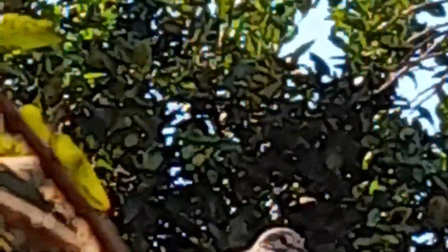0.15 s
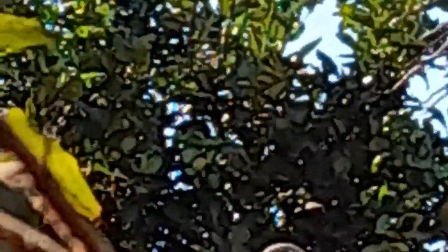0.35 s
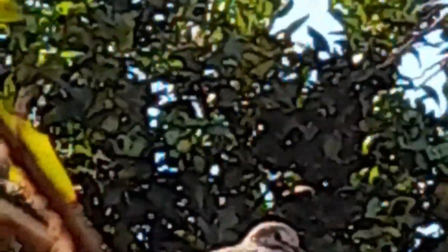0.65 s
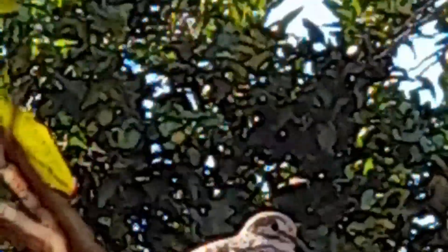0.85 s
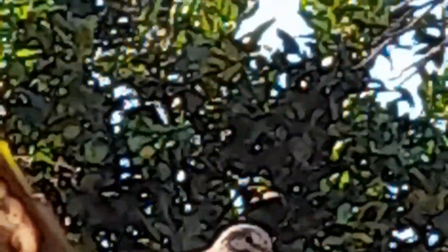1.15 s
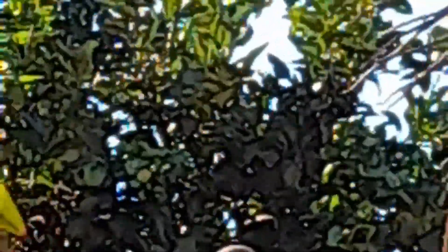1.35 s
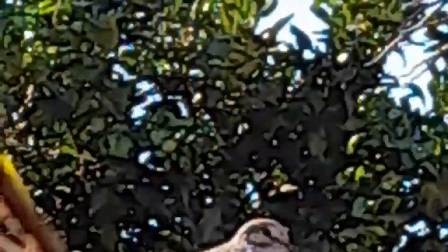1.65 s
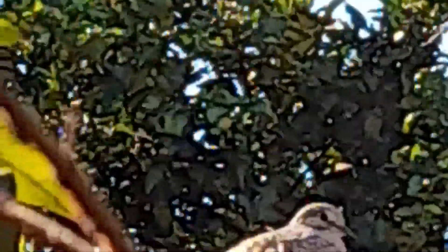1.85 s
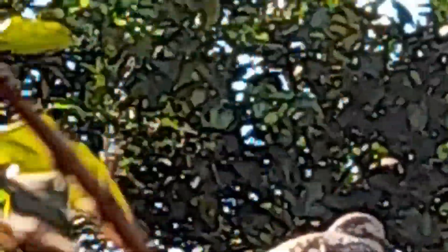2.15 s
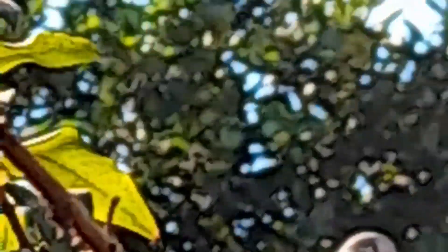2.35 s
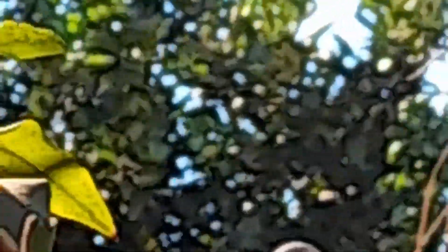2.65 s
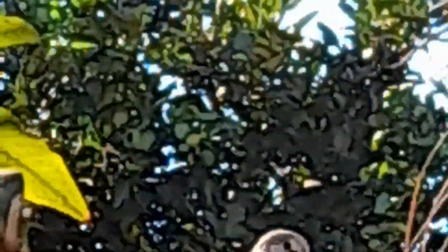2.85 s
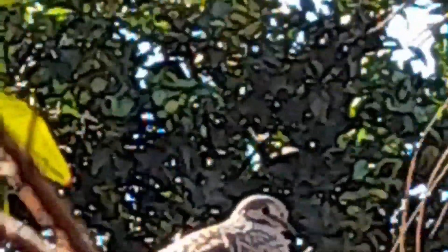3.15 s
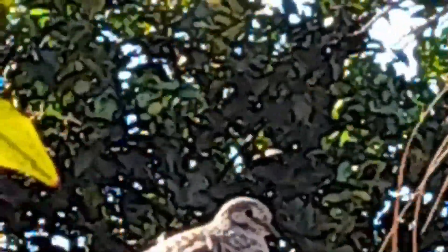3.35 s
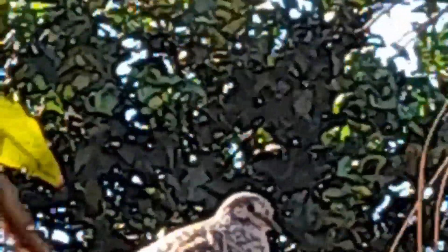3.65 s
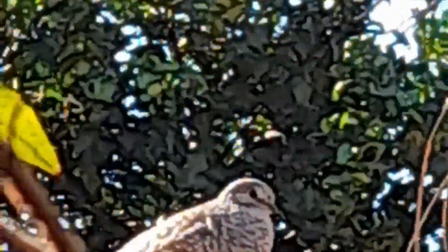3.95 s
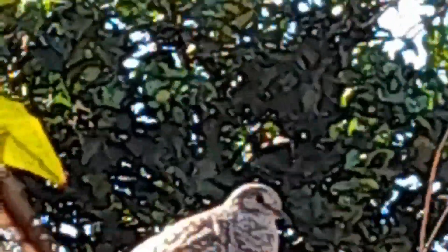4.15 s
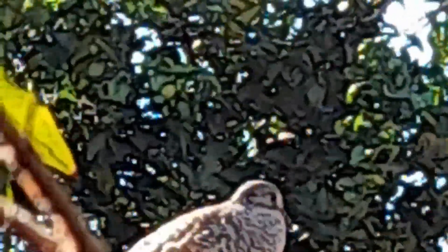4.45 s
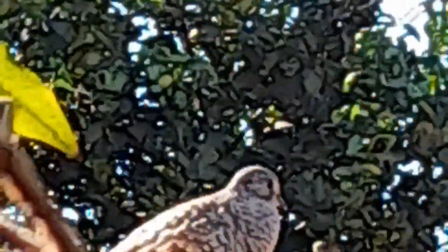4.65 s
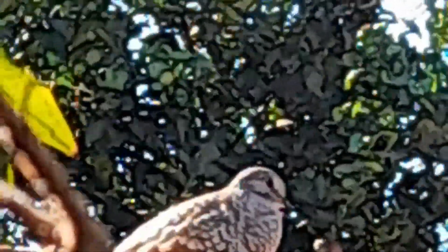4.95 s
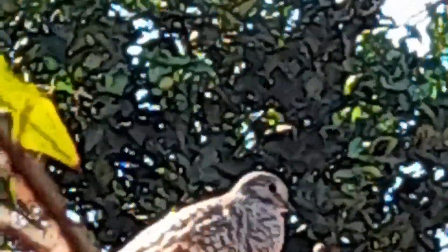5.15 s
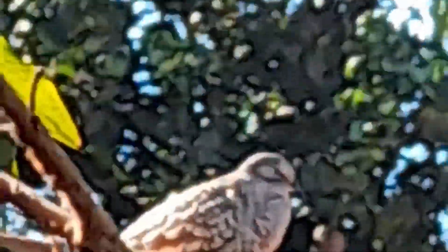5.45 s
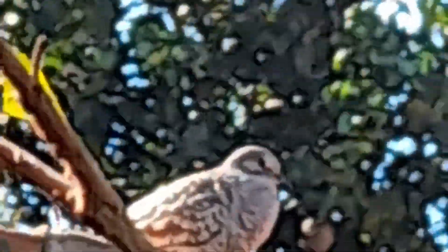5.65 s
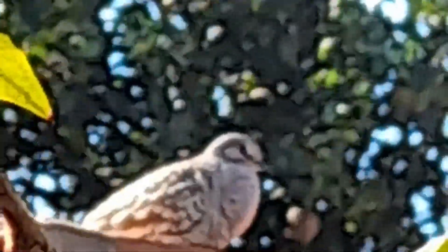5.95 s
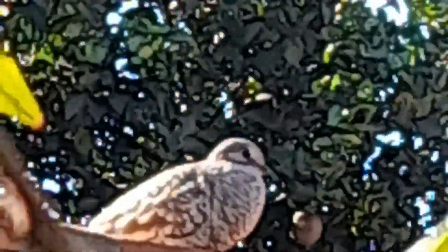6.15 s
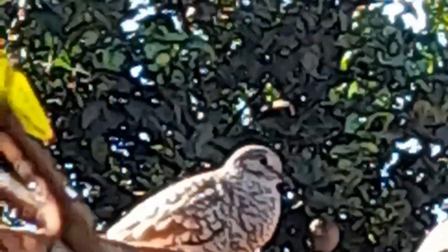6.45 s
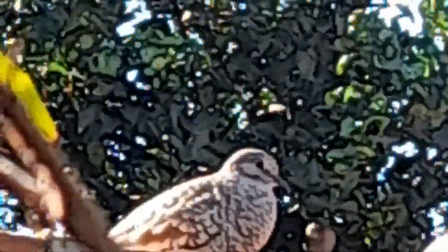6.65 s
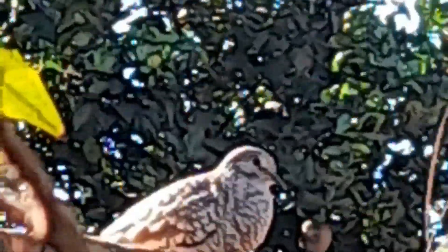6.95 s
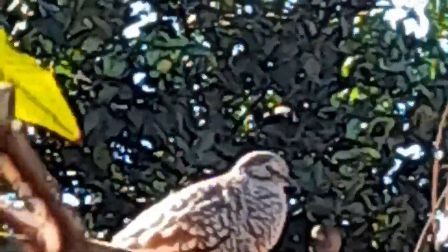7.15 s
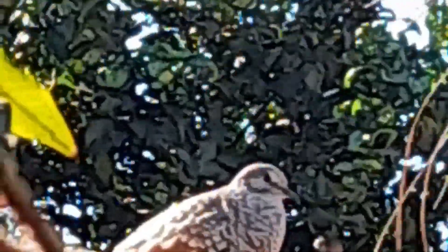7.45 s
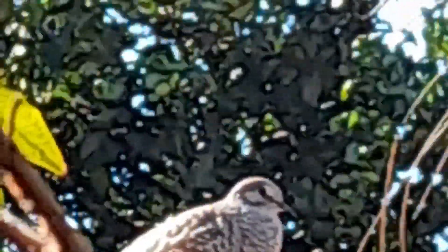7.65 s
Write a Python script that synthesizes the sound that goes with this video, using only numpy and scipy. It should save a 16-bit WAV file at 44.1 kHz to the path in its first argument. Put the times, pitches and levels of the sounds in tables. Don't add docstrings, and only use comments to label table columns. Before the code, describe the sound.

A small dove coos quick three-note phrases outdoors, over low fluttering wind rumble on the microphone, faint leaf hiss and tiny twig ticks.

```python
import sys
import numpy as np
from scipy import signal
from scipy.fft import rfft, irfft, next_fast_len
from scipy.io import wavfile
from scipy.ndimage import uniform_filter1d

SR = 44100
rng = np.random.default_rng(int(sys.argv[2]) if len(sys.argv) > 2 else 0)


def rack_gain(trim_db):
    fader = np.asarray(trim_db, float)
    return 10 ** (fader / 20)


def file_out(sig):
    cols = np.atleast_2d(sig).T
    lim = np.clip(cols, -1, 1)
    pcm = np.round(lim * 32767).astype(np.int16)
    wavfile.write(sys.argv[1], SR, pcm)


N = 343539
T = np.arange(N) / SR
M = next_fast_len(N)
F = np.maximum(np.arange(M // 2 + 1) * SR / M, 1)

FIRST = dict(lead_s=.011, attack_s=.018, hold_s=.19, top_hz=975, scoop_hz=255, scoop_s=.013,
             sag_hz=293, bend=1.01, release_db_s=480)
SHORT = dict(lead_s=.009, attack_s=.005, hold_s=.048, top_hz=994, scoop_hz=139.7, scoop_s=.0068,
             sag_hz=267, bend=2.97, release_db_s=1900)
LONG = dict(lead_s=.008, attack_s=.014, hold_s=.2, top_hz=953.3, scoop_hz=290.4, scoop_s=.0095,
            sag_hz=179.7, bend=1.6, release_db_s=330)
PEAK_DB, DB_PER_HZ, SLACK_HZ_S = 1.1, .035, 1400
# [t/s, stretch/1, pitch factor/1, level/dB]
FIRST_COOS = [
    (1.344, 1.044, 1.006, -32.5),
    (3.815, 0.942, 0.991, -32.1),
    (5.483, 1.015, 1.0, -32.0),
    (7.17, 1.032, 1.002, -31.4),
]
# [t/s, stretch/1, pitch factor/1, level/dB]
SHORT_COOS = [
    (-0.008, 1.041, 0.988, -29.4),
    (1.724, 1.018, 0.995, -31.1),
    (4.194, 1.01, 0.996, -29.1),
    (5.858, 1.0, 1.004, -31.0),
    (7.546, 0.997, 1.003, -28.7),
]
# [t/s, stretch/1, pitch factor/1, level/dB]
LONG_COOS = [
    (0.103, 0.976, 0.996, -30.4),
    (1.831, 0.969, 0.996, -31.3),
    (4.301, 0.963, 0.998, -29.1),
    (5.965, 1.007, 1.002, -29.6),
    (7.653, 1.03, 0.997, -29.1),
]
# [f/Hz, t60/s, left gain/1, right gain/1], negative = inverted
YARD_MODES = [(614, 0.17, 0.89, 1.23), (668, 0.14, 0.47, 1.05), (662, 0.37, 0.89, 1.41),
              (685, 0.53, -0.91, -0.34), (708, 0.64, 0.06, -0.49), (729, 0.12, 0.75, 1.33),
              (738, 0.29, 1.23, 0.88), (744, 0.42, 0.41, 1.57), (767, 0.44, 0.83, 0.23),
              (803, 0.2, 0.55, 1.63), (807, 0.28, 1.48, 0.89), (814, 0.45, 0.49, -0.17),
              (851, 0.38, -1.03, -0.67), (873, 0.11, 0.92, -0.97), (889, 0.56, 0.68, 0.69),
              (899, 0.19, 0.69, 0.43), (930, 0.54, 0.71, 0.33), (943, 0.12, 0.6, 0.32),
              (955, 0.16, 0.6, 0.76), (981, 0.28, -0.63, -0.02)]
TAIL_DB, TAIL_T60_S, TAIL_DELAY_S, TAIL_ALIKE = -9, .58, .05, .65
TURN_HZ, TURN_WIDTH_HZ, TURN_RAD = 845, 18, 1.05

# [t/s, f/Hz]
LOW_TONE_PITCH = [(0, 81.5), (.8, 75.96), (1.7, 63.52), (2.62, 59.04), (2.92, 84), (3.3, 92), (3.8, 91.3),
                  (4.0, 84.1), (4.7, 90.37), (5.5, 78), (5.92, 67.9), (6.2, 67), (6.44, 89.6), (6.64, 89.9),
                  (6.8, 82.5), (7.05, 82.5), (7.35, 95.5), (7.79, 96.3)]
# [t/s, length/s, fundamental level/dB, octave level/dB]
LOW_TONE_SWELLS = [(-.05, .235, -31, -56), (.2, .28, -48.5, -60.5), (.57, .3, -45.5, -64), (.87, .3, -55, -68),
                   (1.436, .1, -55, -54.5), (1.612, .4, -45.5, -63), (2.056, .55, -50.5, -55.5),
                   (2.662, .12, -32, -56), (2.778, .13, -30.5, -46), (2.92, 0.22, -35, -37),
                   (3.12, .13, -29.5, -35.5), (3.239, .3, -29, -46), (3.54, .29, -31.5, -53),
                   (3.902, 0.27, -40, -51), (4.15, .1, -34, -45), (4.29, .17, -28.5, -39),
                   (4.45, .4, -26.5, -40), (4.85, .22, -38, -38.5), (5.11, .26, -38.5, -43.5),
                   (5.4, 0.22, -39.5, -46.5), (5.62, .13, -35, -51), (5.85, .33, -32.5, -43),
                   (6.22, 0.18, -42, -47.5), (6.402, 0.26, -29.5, -39), (6.68, .13, -39, -43),
                   (6.85, 0.39, -46.5, -52.5), (7.23, .24, -25.5, -41), (7.49, .5, -22.5, -37.5)]
RISE_S, FALL_DB_S, ARCH_DB, LULL_DB = 0.051, 400, 1.9, -64
THIRD_HZ, THIRD_WIDTH_HZ, THIRD_LIFT_DB = 236, 12, 19
# [f/Hz, level/dB per Hz]
RUMBLE_SPECTRUM = [(22, -24), (35, -6), (50, 2), (72, 0), (110, -2.5), (150, -6.5), (200, -11),
                   (280, -13.5), (360, -24.5), (420, -69)]

# [f/Hz, level/dB per Hz]
LEAF_SPECTRUM = [(260, -19), (350, -4), (700, -6), (1030, -12.5), (1300, -13), (1800, -17.5), (3600, -17.5),
                 (4150, -16), (4700, -18.5), (7200, -23.5), (8100, -32.5), (9500, -25.5), (12700, -19.5),
                 (15740, -25)]
# [t/s, level/dB, brightness/dB]
LEAF_STIR = [(0, -66, -2.5), (.35, -67.5, -3), (1.28, -68.5, -3.5), (1.76, -67, -1), (2.25, -68, -1),
             (2.62, -68, 1), (2.72, -64.8, -.6), (3.1, -65.5, .4), (3.62, -65.5, 1.5), (3.97, -65.5, -1),
             (4.42, -64, 0), (4.79, -65, 0.5), (5.1, -66.5, 0), (6.2, -66, -0.8), (6.9, -66.5, -2.5),
             (7.4, -65, -2.5), (7.79, -64, -2.5)]
# [f/Hz, left minus right/dB]
PORT_BALANCE = [(60, -7), (135, 0.5), (200, -0.5), (310, -3), (700, 0), (2400, -2.5), (4400, -2.5),
                (7800, -12), (8800, 5), (11500, 3), (15000, -2.5)]
# [f/Hz, power share/1]
PORT_SHARE = [(40, 0.6), (130, 0.78), (300, 0.76), (700, 0.92), (1500, 0.43), (3000, 0.31), (6000, 0.043),
              (15000, .01)]
PORT_LAG = 5.46

# [t/s, peak level/dB, centre f/Hz, bright snap/dB, left minus right/dB]
TWIG_TICKS = [(0.961, -50, 4440, -12, -2), (1.4544, -44.5, 4235, -8, -8.5), (1.515, -42.5, 4124, -13, -1.0),
              (1.5978, -42, 5940, -7, -11), (1.6531, -43, 5020, -11, -9), (1.6624, -49, 3830, -13, -3),
              (1.877, -40, 4065, -11, -2.5), (2.6559, -44, 5350, -12, -1.5), (2.7926, -44, 3960, -10, -1.5),
              (3.6267, -42, 2830, -8, -1.5), (3.8093, -43, 2900, -11, -1.5), (4.143, -41, 3220, -11, -1.0),
              (5.3933, -47, 4100, -12, 1), (6.9355, -38, 4180, -20, -2.0), (7.2919, -40.5, 5540, -21, -5),
              (7.7278, -45, 2760, -19, -6.5)]
# [t/s, length/s, level/dB, centre f/Hz]
LEAF_RUSTLES = [
    (6.93, .025, -60, 4800),
    (7.727, .04, -52.5, 3800),
    (7.75, .045, -53, 3200),
    (3.3, .1, -69, 2300),
    (2.68, .18, -52, 800),
]

HUM_HZ = 312.3
# [t/s, length/s, level/dB]
HUM_BURSTS = [(1.358, .14, -56.5), (2.66, .09, -46.5), (2.81, .08, -49.5), (2.94, .07, -46),
              (3.102, 0.26, -52), (3.78, .09, -55), (4.07, .3, -60), (5.15, .24, -56.5),
              (5.54, 0.085, -49.5), (5.85, .3, -55), (6.218, .12, -48.5), (6.6, .2, -55.5),
              (6.85, .13, -44.5), (7.27, 0.53, -54)]
# [t/s, f/Hz, level/dB]
PASSING_TONES = [
    [(2.05, 88.3, -67), (2.116, 95.1, -55), (2.182, 99.5, -54), (2.378, 96.24, -41), (2.64, 90.3, -49),
     (2.7, 91.6, -51)],
    [(3.2, 415.3, -68), (3.254, 423.1, -59), (3.498, 431, -56.5), (3.75, 422.8, -56.5), (3.85, 420, -81)],
    [(2.85, 64.7, -50), (2.932, 65, -41), (3.03, 59.3, -45), (3.752, 60, -55), (4.058, 57, -49),
     (4.4, 57.3, -42)],
    [(6.7, 250, -58), (6.77, 246, -52), (7.05, 238, -56), (7.15, 240, -60)],
    [(1.15, 245, -70), (1.3, 250, -63), (1.4, 250, -67)],
]


def on_log(points):
    hz, value = np.transpose(points)
    return np.interp(np.log(F), np.log(hz), value)


def walk(rate):
    held = np.repeat(rng.standard_normal(int(T[-1] * rate) + 2), 8)
    slewed = uniform_filter1d(uniform_filter1d(held, size=8), size=8)
    return 1.3 * np.interp(T, np.arange(len(held)) / 8 / rate, slewed)


def coo(notes, lead_s, attack_s, hold_s, top_hz, scoop_hz, scoop_s, sag_hz, bend, release_db_s):
    out = np.zeros(N)
    for start_s, stretch, factor, level_db in notes:
        u = np.arange(-lead_s, hold_s + 40 / release_db_s, 1 / SR / stretch)
        late = np.maximum(u - hold_s, 0)
        scoop = scoop_hz * np.exp(-u / scoop_s)
        sag = sag_hz * (np.maximum(u, 0) / hold_s) ** bend
        hz = top_hz - scoop - sag - SLACK_HZ_S * late
        db = level_db + PEAK_DB - DB_PER_HZ * (hz.max() - hz) - release_db_s * late
        phase = 2 * np.pi * np.cumsum(factor * hz) / SR
        attack = np.clip((u + lead_s) / attack_s, 0, 1)
        note = rack_gain(db) * attack * (np.sin(phase) + rack_gain(-43.5) * np.sin(2 * phase))
        at = int((start_s - lead_s * stretch) * SR) + np.arange(len(u))
        heard = (at >= 0) & (at < N)
        out[at[heard]] += note[heard]
    return out


def yard_reply():
    t = T[:SR // 2]
    reply = np.zeros((2, len(t)))
    for hz, t60_s, *gain in YARD_MODES:
        fade = np.log(1000) / t60_s
        ring = 2 * fade / SR * np.exp(-fade * t) * np.sin(2 * np.pi * hz * t)
        reply += np.array(gain)[:, None] * ring
    both, *own = rng.standard_normal((3, len(t)))
    scatter = np.sqrt(TAIL_ALIKE) * both + np.sqrt(1 - TAIL_ALIKE) * np.array(own)
    scatter *= np.exp(-np.log(1000) * t / TAIL_T60_S)
    scatter *= 1 - np.exp(-(t / TAIL_DELAY_S) ** 2)
    return reply + rack_gain(TAIL_DB) * scatter / np.sqrt(np.sum(scatter ** 2) / 2)


def dove():
    dry = coo(FIRST_COOS, **FIRST) + coo(SHORT_COOS, **SHORT) + coo(LONG_COOS, **LONG)
    lagged = np.interp(np.arange(N) - 5.6, np.arange(N), dry)
    direct = np.array([dry, .85 * lagged])
    left, right = direct + signal.oaconvolve(dry[None], yard_reply(), axes=1)[:, :N]
    behind = np.exp(-.5j * TURN_RAD * (1 + np.tanh((F - TURN_HZ) / TURN_WIDTH_HZ / 2)))
    return np.array([irfft(rfft(left, M) * behind, M)[:N], right])


def swell(starts_s, lengths_s, levels_db):
    size = rack_gain(LULL_DB) + 0 * T
    for s, length, db in zip(starts_s, lengths_s, levels_db):
        on = slice(max(int((s - RISE_S) * SR), 0), int((s + length + 50 / FALL_DB_S) * SR))
        u = T[on] - s
        arch_db = ARCH_DB * (.33 - np.minimum(2 * u / length - 1, 1) ** 2)
        fall_db = FALL_DB_S * np.maximum(u - length + 0.013, 0)
        burst = rack_gain(db + arch_db - fall_db) * np.clip(u / RISE_S + 0.61, 0, 1)
        size[on] = np.maximum(size[on], burst)
    return 20 * np.log10(size)


def tone(hz, db, drift, flutter_db, rate, rough):
    phase = 2 * np.pi * np.cumsum(hz) / SR + drift * walk(rate)
    size = rack_gain(db + flutter_db * walk(rate)) * np.sqrt(2)
    phase = np.array([phase, phase - 2 * np.pi * hz * PORT_LAG / SR])
    rasp, twist = rough * walk(45), rough * walk(45)
    own = .17 * np.array([walk(rate) for _ in range(2)])
    in_phase = (1 + rasp + own) * np.sin(phase)
    quadrature = (twist + own[::-1] * [[1], [-1]]) * np.cos(phase)
    return size * (in_phase + quadrature)


def breeze(shape, db_of, swell_db, flicker_db, flicker_rate):
    both, left, right = rfft(rng.standard_normal((3, M)))
    share = np.clip(on_log(PORT_SHARE), 0, 1)
    late = np.exp(-2j * np.pi * F * PORT_LAG / SR)
    common = both * np.array([late ** 0, late])
    pair = np.sqrt(share) * common + np.sqrt(1 - share) * np.array([left, right])
    low_hz, high_hz = shape[0][0], shape[-1][0]
    pair = pair * rack_gain(on_log(shape) + on_log(PORT_BALANCE) * np.array([[.5], [-.5]]))
    pair = pair * (F >= low_hz) * (F <= high_hz)
    out, common_swell = 0, walk(15)
    for hz in low_hz * 2 ** np.arange(0, np.log2(high_hz / low_hz) + .5, .5):
        band = irfft(pair * np.clip(1 - 2 * abs(np.log2(F / hz)), 0, 1), M)[:, :N]
        out = out + band * rack_gain(db_of(hz) + swell_db * common_swell + flicker_db * walk(flicker_rate))
    return out


def low_rumble():
    hz = np.interp(T, *np.transpose(LOW_TONE_PITCH))
    s, length, *levels_db = np.transpose(LOW_TONE_SWELLS)
    first_db, second_db = (swell(s, length, db) for db in levels_db)
    lift_db = THIRD_LIFT_DB * np.exp(-((3 * hz - THIRD_HZ) / THIRD_WIDTH_HZ) ** 2)
    third_db = second_db - 21.0 + lift_db + 3.1 * walk(9)
    lines = 0
    for k, db in enumerate([first_db, second_db, third_db], 1):
        lines = lines + tone(k * hz, db - .5, drift=.08 * k, flutter_db=0.56, rate=14, rough=0.1)
    eddies_db = 0.51 * uniform_filter1d(first_db, size=5000) - 1.15
    turbulence_db = .6 * uniform_filter1d(first_db, size=9000) - 6.5 + 1.8 * walk(7)

    def db_of(hz):
        return turbulence_db if hz < 55 else eddies_db
    return lines + breeze(RUMBLE_SPECTRUM, db_of, swell_db=0.5, flicker_db=0.9, flicker_rate=8)


def leaves():
    s, *columns = np.transpose(LEAF_STIR)
    db, top_db = (np.interp(T, s, c) for c in columns)
    push_db = uniform_filter1d(swell(*np.transpose(LOW_TONE_SWELLS)[:3]), size=6000)
    push_db = push_db - push_db.mean()
    puffs = walk(26)

    def db_of(hz):
        if hz > 7800:
            lean_db = top_db + 1.5 + 1.3 * puffs
        elif hz < 750:
            lean_db = .23 * push_db - .9 * (top_db + 1.9)
        elif hz < 1800:
            lean_db = .12 * push_db - .3 * (top_db + 1.2)
        else:
            lean_db = 0
        return db + 33 + lean_db
    return breeze(LEAF_SPECTRUM, db_of, swell_db=0.22, flicker_db=1.17, flicker_rate=20) * rack_gain(-1.0)


def twigs():
    out = np.zeros((2, N + 256))
    t = T[:256]

    def add(s, db, hz, snap_db, pan_db):
        snap = np.diff(rng.standard_normal(258), 2) * np.exp(-t / 0.00094) / 3
        ring = np.exp(-t / 0.00047) * np.sin(2 * np.pi * hz * t)
        tick = rack_gain(db) * (ring + rack_gain(snap_db) * snap)
        out[:, int(s * SR):int(s * SR) + 256] += tick * rack_gain(np.array([[pan_db], [-pan_db]]) / 2)
    for s, db, hz, snap_db, pan_db in TWIG_TICKS:
        add(s + .0008, db - 1, hz, snap_db + 11, pan_db)
    for s, length, db, hz in LEAF_RUSTLES:
        for when, size, pitch, side in rng.random((150, 4)):
            tick_s = min(s + 2 * length * when ** 1.7, T[-1])
            tick_db = db - 4 * np.log(size + .08) - 14 * when
            add(tick_s, tick_db, hz * 2 ** (1.6 * pitch - .8), -14, 12 * side - 6)
    for when, size, pitch, side in rng.random((400, 4)):
        add(when * T[-1], -62 - 3.2 * np.log(size + .03), 9000 + 6000 * pitch, 0, 16 * side - 8)
    return out[:, :N]


def passing(table, **unsteady):
    s, hz, db = np.transpose(table)
    inside = 1. * ((T >= s[0]) & (T <= s[-1]))
    inside = uniform_filter1d(inside, size=3000, mode="nearest")
    return inside * tone(np.interp(T, s, hz), np.interp(T, s, db), **unsteady)


def hum_and_tones():
    hum_db = swell(*np.transpose(HUM_BURSTS)) - 3
    out = tone(HUM_HZ + 0 * T, hum_db, drift=2.4, flutter_db=3.0, rate=14, rough=0.53)
    for table in PASSING_TONES:
        out = out + passing(table, drift=0.41, flutter_db=-0.2, rate=18, rough=0.17)
    return out


def scene():
    return dove() + low_rumble() + leaves() + twigs() + hum_and_tones()


def top_cut(x):
    return signal.sosfilt(signal.butter(12, 15820, fs=SR, output="sos"), x)


def record(dry):
    return top_cut(dry)


dry = scene()
out = record(dry)
file_out(out)
```